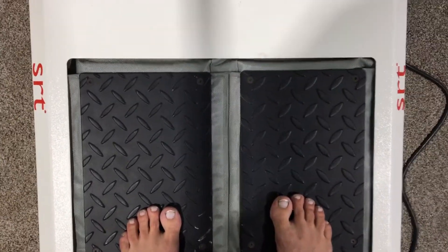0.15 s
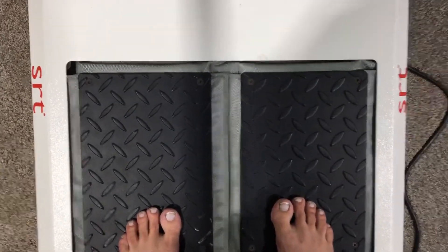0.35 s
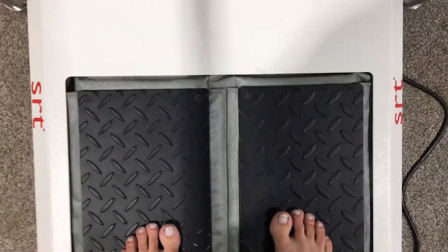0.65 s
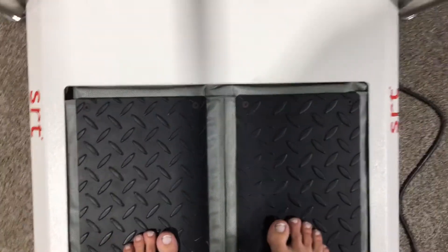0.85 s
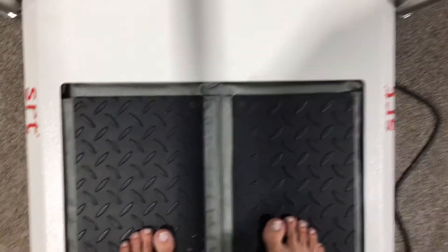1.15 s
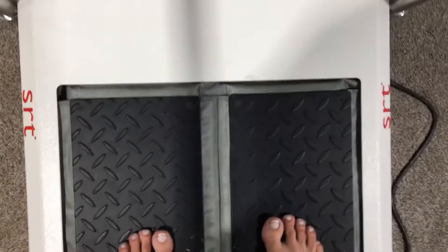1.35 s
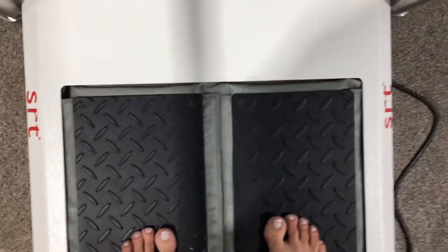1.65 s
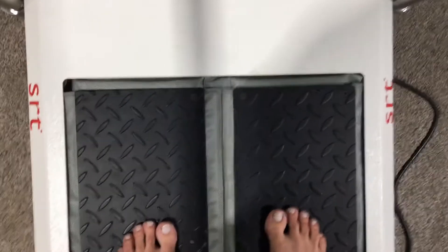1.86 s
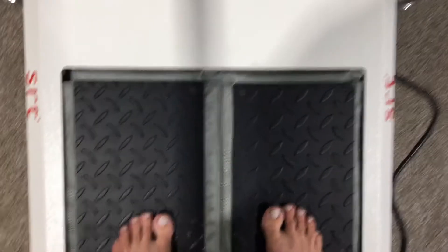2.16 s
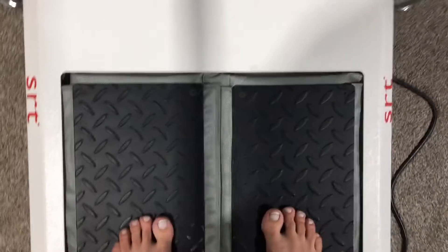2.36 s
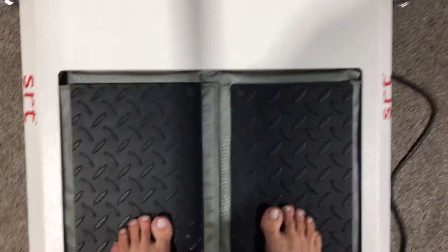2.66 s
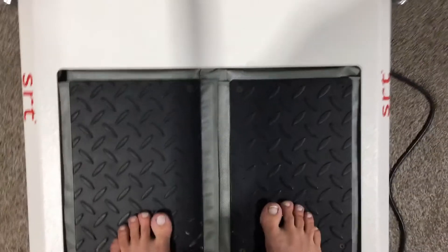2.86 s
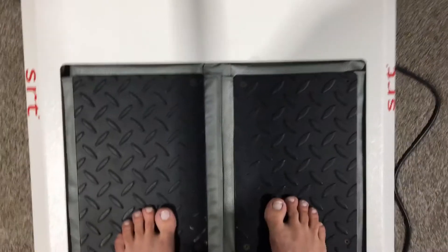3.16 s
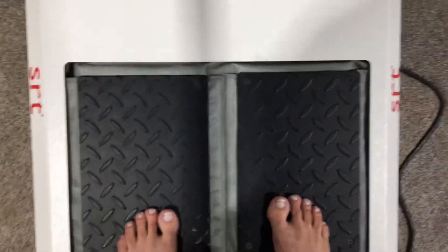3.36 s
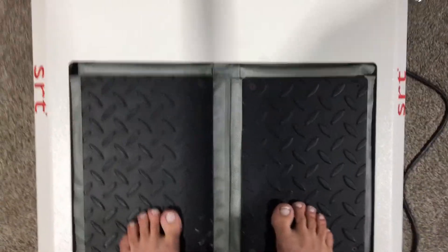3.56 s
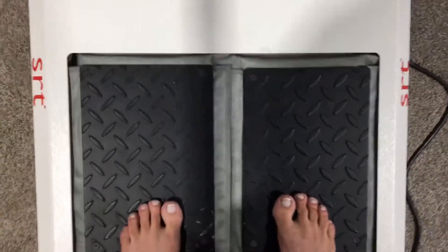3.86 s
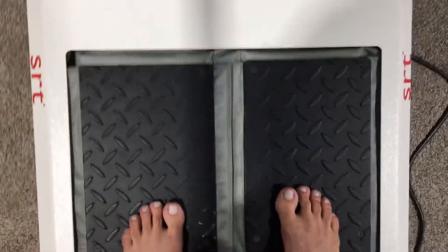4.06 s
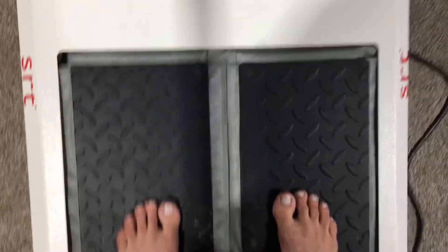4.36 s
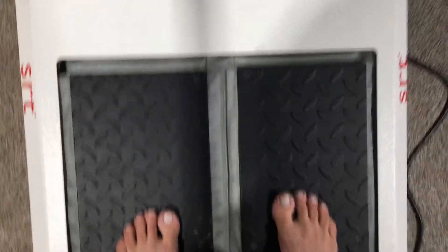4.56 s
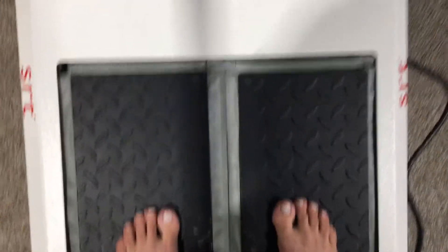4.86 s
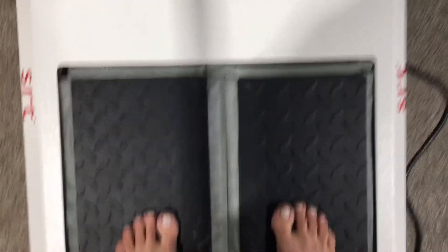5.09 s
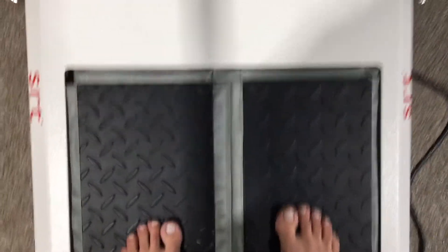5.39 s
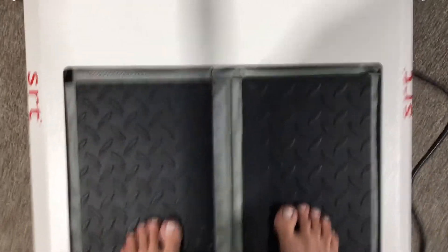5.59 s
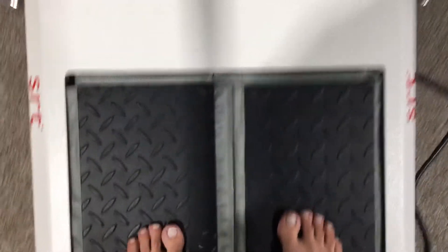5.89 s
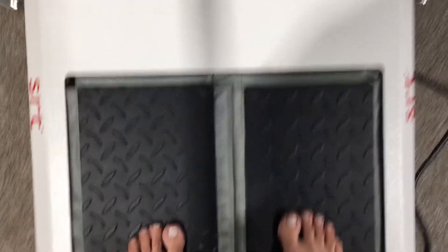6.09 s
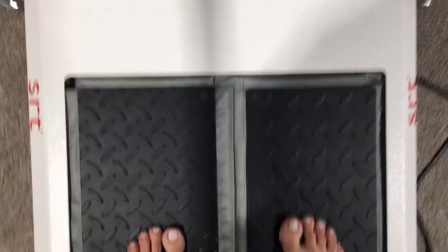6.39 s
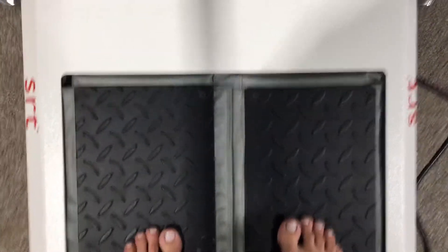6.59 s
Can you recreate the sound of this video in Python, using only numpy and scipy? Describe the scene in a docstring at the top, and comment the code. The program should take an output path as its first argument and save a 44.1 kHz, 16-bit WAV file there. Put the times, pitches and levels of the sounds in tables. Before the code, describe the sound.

A vibration therapy platform accelerates throughout, heard from above in a carpeted room with short, dull reverb. From the start its foot plates knock softly into a hollow housing, about ten low thuds a second, tripling in rate and growing much louder by the end. Dry ticks from the mounts dot the first 2 seconds, and crisp little fabric snaps continue until about 4 seconds. Humming overtones swell and fade as the speed climbs. From around 3 seconds loose parts buzz more strongly, and the plates' scratchy rubbing against their fabric edging grows, becoming a bright rhythmic hiss by 5 seconds. Between roughly 4.5 and 6 seconds the drive clacks, with several harder hits. Underneath are a very faint, thin motor whistle and a faint gear tone near 3 seconds. The machine is still running fast and loud at the end, near 6.7 seconds.

```python
"""In a carpeted room, a vibration therapy platform runs up to speed under bare feet, heard from above.
Its crank thuds the foot plates twice a turn into a hollow housing, and overtones swell as they climb
through its resonances. A slower stroke thumps, clacks and rubs the plates on their fabric edging
with a scratchy, rhythmic hiss, while loose parts buzz and the mounts tick.
Under it all are a faint gear tone and the thin whistle of the motor's switching supply."""
import sys
import numpy as np
from scipy import signal
from scipy.fft import rfft, irfft, next_fast_len
from scipy.io import wavfile
from scipy.ndimage import uniform_filter1d, map_coordinates

SR = 44100
rng = np.random.default_rng(int(sys.argv[2]) if len(sys.argv) > 2 else 0)


def generate_wav(signal):
    """Clip the signal to [-1, 1] and save it as 16-bit WAV at the path in sys.argv[1]."""
    frames = np.transpose(np.atleast_2d(signal))
    scaled = np.clip(frames, -1, 1) * 32767
    pcm = np.round(scaled).astype(np.int16)
    wavfile.write(sys.argv[1], SR, pcm)


N = 296966
TIME = np.arange(N) / SR
CRUISE_SPEED, TURNS_PER_STROKE = 12, 1.53  # speeds are in crank turns per second
DOWN_PLACE, RETURN_PLACE = .225, .725  # the ends of the plates' travel [turns]


def amp(db):
    """Decibels to gain."""
    return 10 ** (np.asarray(db) / 20)


def unit(x):
    """Scaled to rms 1."""
    return x / np.sqrt(np.mean(x ** 2) + 1e-20)


def curves(rows):
    """One value per sample for each column after the time."""
    s, *cols = np.transpose(rows)
    return [np.interp(TIME, s, c) for c in cols]


def wobble(rate):
    """A smooth random curve, rate knots a second."""
    return map_coordinates(rng.standard_normal(int(N * rate / SR) + 4), [TIME * rate])


def filtered(x, response):
    """x times a complex response of frequency."""
    m = 2 * next_fast_len(N // 2 + SR // 2)
    return irfft(rfft(x, m) * response(np.fft.rfftfreq(m, 1 / SR)), m)[:N]


def coloured(x, points):
    """x through a causal EQ drawn as (frequency [Hz], gain [dB]) points."""
    def response(hz):
        f, db = np.transpose(points)
        cepstrum = irfft(np.log(amp(np.interp(np.log(hz + 1), np.log(f), db))))
        cepstrum[1:len(hz) - 1] *= 2
        cepstrum[len(hz):] = 0
        return np.exp(rfft(cepstrum))
    return filtered(x, response)


def blows(cycles, place, scatter_db, jitter_s):
    """One blow per cycle at the given place, each a little different in size and time."""
    at = np.flatnonzero(np.diff(np.floor(cycles - place)) > 0)
    size, late = rng.standard_normal((len(at), 2)).T
    onsets = np.clip(at + late * jitter_s * SR, 0, N - 1).astype(int)
    return np.bincount(onsets, amp(scatter_db * size), N)


def contact(cycles, place, length):
    """A rounded gate that opens once per cycle."""
    off = (cycles - place + .5) % 1 - .5
    return np.exp(-.5 * np.abs(off / length) ** 3)


def grains(rate, spread_db):
    """Random tiny impacts of uneven size, rms 1."""
    impacts = (rng.random(N) < rate / SR) * rng.choice([-1, 1], N)
    return unit(impacts * amp(spread_db * rng.standard_normal(N)))


def bursts(rows, rise_s):
    """An envelope with one quick swell and decay for each (time [s], level [dB]) row."""
    out, u = np.zeros(N + SR), np.arange(SR // 10) / SR / rise_s
    for s, db in rows:
        out[round(s * SR):][:len(u)] += amp(db) * u * np.exp(1 - u)
    return out[:N]


def levelled(gate):
    """A gate scaled to a mean power of 1 over half a second."""
    return gate / np.sqrt(uniform_filter1d(uniform_filter1d(gate ** 2, SR // 2), SR // 4))


def step(x, middle, spread):
    """A soft step from 0 to 1 as x passes the middle."""
    return .5 + .5 * np.tanh((x - middle) / (2 * spread))


def growing(speed, cruise_db, doubling_db):
    """Gain of a part that is shaken harder with every doubling of speed."""
    return amp(cruise_db + doubling_db * np.log2(speed / CRUISE_SPEED))


def waking(speed, slow_db, rise_db, middle, spread):
    """Gain of a part that shakes loose around the middle speed."""
    return amp(slow_db + rise_db * step(speed, middle, spread))


def resonance(x, modes):
    """Gain as a frequency or speed x passes the (centre, half width, level [dB]) resonances."""
    return sum(amp(db) / (1 + ((x - centre) / width) ** 2) for centre, width, db in modes)


def thuds(turns, speed):
    """The plates land a firm, damped thud on every downstroke and a lighter one on the return."""
    # round, boxy thud: (frequency [Hz], gain [dB])
    thud_eq = [(70, -42.5), (140, -14.5), (185, -0.5), (215, 5.5), (255, -0.5), (290, -2), (320, -9),
               (400, -18.5), (480, -25.5), (900, -53.5), (3000, -120)]
    down = blows(turns, DOWN_PLACE, scatter_db=1.8, jitter_s=.00022)
    back = amp(-3) * blows(turns, RETURN_PLACE, scatter_db=2.5, jitter_s=.0003)
    thudding = unit(coloured((down + back) / np.sqrt(speed), thud_eq))
    return growing(speed, cruise_db=-32.5, doubling_db=8.5) * thudding


def crank(turns, speed):
    """The crank knocks the hollow body twice a turn: one steady blow, one more uneven."""
    down = blows(turns, .25, scatter_db=.67, jitter_s=.00024)
    up = blows(turns, .76, scatter_db=3.5, jitter_s=.00027)
    knocks = down + amp(-9) * coloured(up, [(50, -6), (100, 10.5), (200, 7.5), (400, -8)])
    return growing(speed, cruise_db=-34, doubling_db=8.9) * unit(body(knocks / np.sqrt(speed)))


def body(x, cut_hz=37):
    """Plates and housing boom at their low resonances; the deepest bass does not radiate."""
    # body modes: (frequency [Hz], width [Hz], level [dB])
    modes = [(51.4, 17.8, 1), (83, 16.2, 1), (102, 8.24, 3.5), (107.6, 11.84, 4), (139.6, 9.4, 2.5)]

    def response(f):
        boom = sum((-1) ** k * amp(db) * 1j * f * width / (hz * hz - f * f + 1j * f * width)
                   for k, (hz, width, db) in enumerate(modes))
        return boom * f ** 2 / (f ** 2 - cut_hz ** 2 - 1j * np.sqrt(2) * f * cut_hz)
    return filtered(x, response)


def hum(turns, speed, belt_order=24):
    """Overtones sing out in turn as they cross the resonances of plates, frame and belt."""
    # swells of the sprung plates: (crank order, frequency [Hz], half width [Hz], level [dB])
    plate_swells = [(6, 51.1, 6.5, -30), (9, 78.3, 9.5, -27.5), (10, 76, 4.4, -33.5), (9, 105.6, 6.4, -32),
                    (5, 52.7, 5, -32.5), (7, 80, 4.8, -42), (7, 88.8, 10, -28.5), (8, 95, 3.8, -30),
                    (6, 94.5, 7.9, -21.5), (4, 59, 5.6, -33.5)]
    # overtones that drive the frame: (crank order, level [dB])
    frame_drive = [(9, -21.5), (10, -35), (12, -29.5), (14, -35), (16, -36.5), (18, -36.5), (20, -33),
                   (22, -37)]
    # frame and belt resonances: (frequency [Hz], half width [Hz], level [dB])
    frame_modes = [(138.1, 5.8, -0.5), (209, 7.2, -6.5), (264, 5.6, -2)]
    belt_mode = [(137.2, 7.6, 0)]

    def overtone(order, modes):
        return np.cos(2 * np.pi * order * (turns - .27)) * resonance(order * speed, modes)
    plates = sum(overtone(order, [mode]) for order, *mode in plate_swells)
    frame = sum(amp(db) * overtone(order, frame_modes) for order, db in frame_drive)
    per_turn = belt_order / TURNS_PER_STROKE
    belt = amp(-27) * np.cos(2 * np.pi * per_turn * turns) * resonance(per_turn * speed, belt_mode)
    return plates + frame + belt


def housing(turns, strokes, speed):
    """The loaded plates jostle on their mounts and thump where the stroke reverses."""
    # deep rumble and hollow shell: (frequency [Hz], gain [dB])
    rumble_eq = [(15, -85.5), (30, -30.5), (50, -7.5), (85, 0.5), (113, 2), (127, 1), (138, 0), (149, -20),
                 (175, -16), (300, -89.5)]
    shell_eq = [(100, -43.5), (160, -21), (180, 2.5), (200, -1.5), (265, 1.5), (295, -3.5), (312, -7),
                (330, -11), (342, -18), (395, -15), (450, -26), (700, -76)]
    rumble = unit(coloured(grains(500, spread_db=1), rumble_eq))
    reversal = .41 + .04 * (speed - CRUISE_SPEED)  # later in the stroke as the speed grows
    by_crank = contact(turns, DOWN_PLACE, length=.072) + .5 * contact(turns, RETURN_PLACE, length=.071)
    jolts = .6 + by_crank + .45 * contact(strokes, reversal + .06, length=.12)
    chatter = unit(coloured(levelled(jolts) * grains(1200, spread_db=1), shell_eq))
    thumps = unit(coloured(blows(strokes, reversal, scatter_db=1.5, jitter_s=.002), shell_eq))
    return (growing(speed, cruise_db=-31, doubling_db=3.2) * rumble
            + growing(speed, cruise_db=-33, doubling_db=7.3) * chatter
            + growing(speed, cruise_db=-38.5, doubling_db=12.4) * thumps)


def slack_force(strokes, speed):
    """The drive's slack strikes and rebounds once a stroke, most near one speed, with a few hard hits."""
    # where the slack clacks most: (speed [turns/s], half width [turns/s], level [dB])
    clack_peak = [(13.68, 1.76, -40)]
    # hard accents: (time [s], relative level [dB])
    accents = [(4.574, -33), (4.817, -28.5), (4.999, -33), (5.053, -28), (5.399, -32), (5.511, -32),
               (5.621, -41), (5.94, -28), (6.049, -30), (6.716, -35)]
    strike = contact(strokes, .503, length=.055)
    rebound = amp(-7.5) * contact(strokes, .063, length=.053)
    regular = resonance(speed, clack_peak) * (strike + rebound)
    return np.maximum(regular, amp(-9) * bursts(accents, rise_s=.004))


def rattle(turns, strokes, speed):
    """The drive clacks, loose parts buzz, and the panel shakes after each thud and with each clack."""
    # hard clack, bright buzz and mid-range panel: (frequency [Hz], gain [dB])
    clack_eq = [(300, -15), (450, 5.5), (700, 9.5), (950, 2), (1300, 3.5), (1700, -7.5), (2300, -11),
                (3100, -14), (4500, -23), (12000, -55)]
    buzz_eq = [(400, -21.5), (750, 9.5), (1000, 6), (1300, 6.5), (1700, -2), (2150, -1), (2800, -7.5),
               (4500, -16), (8000, -25.5), (15000, -60)]
    panel_eq = [(280, -30.5), (375, 10), (440, 6), (500, 5), (560, 11), (620, 8.5), (710, 6), (800, -3.5),
                (1100, -39.5)]
    force = slack_force(strokes, speed)
    clack = force * unit(coloured(grains(6000, spread_db=1), clack_eq))
    buzz = unit(coloured(amp(2.56 * wobble(90)) * grains(2000, spread_db=-1.5), buzz_eq))
    after_thuds = 1 + .51 * (contact(turns, .36, length=.13) + contact(turns, .81, length=.073))
    shaking = after_thuds * np.sqrt(1 + .35 * unit(force))
    panel = unit(coloured(shaking * grains(1500, spread_db=2), panel_eq))
    return (clack + waking(speed, slow_db=-60.5, rise_db=9.5, middle=11.5, spread=1.14) * buzz
            + waking(speed, slow_db=-56, rise_db=10, middle=10.5, spread=1.05) * panel)


def rubbing(strokes, speed):
    """The plates brush their fabric edging once a stroke: dull and scratchy when slow, then hissy."""
    # where the first plate rubs: (time [s], place [strokes])
    rub_place = [(0, 0.895), (3, 0.86), (4.5, 1.04), (5.7, 1), (6.73, 0.95)]
    # how hard the plates press on the edging: (time [s], level [dB])
    pressure = [(0, -74.5), (1.1, -73.5), (2.2, -72), (2.9, -68), (4, -63), (4.8, -55.5), (5.7, -53.5),
                (6.73, -56.5)]
    # fibre hiss, dull scuff and squeaky crest: (frequency [Hz], gain [dB])
    hiss_eq = [(1500, -32), (3000, -10), (3600, 6), (4300, 5.5), (5000, -2), (6200, 2), (7600, -2),
               (9000, -1), (10300, -9.5), (11400, -4), (13500, -13), (15800, -8)]
    scuff_eq = [(2500, -6), (3500, -3.5), (4300, 1.5), (5000, -8), (7000, -19), (12000, -59)]
    squeak_eq = [(4000, -32), (7500, -12), (9000, 0), (10300, -2), (11400, -20), (13500, -13), (15800, -12)]
    first_place, = curves(rub_place)
    rub_db, = curves(pressure)
    slipping = step(speed, 9.73, spread=.35)  # the second plate slips out of step...
    fast = step(speed, 11.85, spread=.75)  # ...then stops rubbing
    slow = 1 - fast
    second_place = rub_place[0][1] - .53 * slipping
    second_rub = amp(1) * slow * contact(strokes, second_place, length=.087)
    length = .11 + .01 * fast
    gate = np.hypot(contact(strokes, first_place, length), second_rub)
    brush = np.hypot(gate, amp(-6.5 - 14 * fast))  # light brushing between the rubs
    sticking = slow * np.minimum(gate, 1)
    scratch = (1 - sticking) * amp(.8 * wobble(120)) + sticking * stick_slip()
    fibres = brush * unit(coloured(grains(14000, spread_db=3.5), hiss_eq))
    scuff = amp(2 + slipping) * slow * gate * unit(coloured(grains(5400, spread_db=5), scuff_eq))
    mid_rub = contact(strokes, first_place + .01, .56 * length)
    squeak = amp(-9) * mid_rub * unit(coloured(grains(7700, spread_db=1), squeak_eq))
    return amp(rub_db) * levelled(brush) / brush * (scratch * (fibres + squeak) + scuff)


def stick_slip(slips_per_s=81, decay_s=.012, slide=.31):
    """A train of tiny slips at an uneven rate over smooth sliding, rms 1."""
    cycles = np.cumsum(slips_per_s * amp(3 * wobble(50))) / SR
    slips = blows(cycles, 0, scatter_db=2, jitter_s=.001)
    return unit(slide + signal.lfilter([1], [1, -np.exp(-1 / (decay_s * SR))], slips))


def catches():
    """Crisp little snaps where the edging catches on a plate and lets go."""
    # fabric snaps: (time [s], relative level [dB])
    snaps = [(0.2218, -50), (0.3271, -53.5), (0.4922, -48), (0.7227, -58), (0.9537, -56), (1.1398, -53),
             (1.2072, -53), (1.3727, -53), (2.154, -52), (2.2257, -60), (2.4622, -47), (2.781, -47),
             (2.9147, -47), (3.052, -49), (3.215, -49), (3.496, -46), (3.5106, -46), (3.6385, -47),
             (3.6544, -44), (3.7707, -46), (3.7873, -43), (3.9229, -42), (4.0481, -47), (4.1808, -46)]
    # their crisp top: (frequency [Hz], gain [dB])
    snap_eq = [(2000, -25), (3800, 6), (7000, 2), (10000, -2), (12500, -7), (15800, -19)]
    return amp(-10.5) * bursts(snaps, rise_s=.0028) * unit(coloured(rng.standard_normal(N), snap_eq))


def ticks(t60_s=.03):
    """Dry ticks from the mounts while the plates still move slowly."""
    # single ticks: (time [s], relative level [dB])
    cues = [(0.058, -45), (0.098, -45.5), (0.123, -43.5), (0.2315, -42), (0.327, -59), (0.4625, -50),
            (0.4947, -49), (0.622, -44), (0.724, -44), (0.964, -47), (1.18, -47), (1.2705, -50),
            (1.399, -46), (1.468, -52), (1.5943, -57), (1.8565, -53), (2.1618, -47), (2.2107, -47),
            (2.2275, -44.5)]
    # their dry click: (frequency [Hz], gain [dB])
    tick_eq = [(400, -18), (900, 10.5), (1600, 8), (2400, -3), (4500, -16), (9000, -21), (15000, -41)]
    out, t = np.zeros(N + SR), np.arange(SR // 10) / SR
    for s, db in cues:
        snap = 9 * (t == 0) + .9 * amp(-60 * t / t60_s) * rng.standard_normal(len(t))
        out[round(s * SR):][:len(t)] += amp(db) * snap
    return coloured(out[:N], tick_eq)


def gear(turns, speed, order=60, panel_hz=570, half_width_hz=70):
    """The meshing teeth sing faintly as their pitch crosses a panel resonance."""
    near_panel = 1 / (1 + ((order * speed - panel_hz) / half_width_hz) ** 4)
    mesh = np.sin(2 * np.pi * order * turns + 1.1 * wobble(45))
    return amp(-53.5 + 2.7 * wobble(45)) * near_panel * mesh


def bearing():
    """A fine, steady crackle from the bearing."""
    # its narrow ring: (frequency [Hz], gain [dB])
    ring_eq = [(700, -22), (1200, -10), (1600, 14), (1900, 0), (2300, -14), (3200, -5), (8000, -21)]
    return amp(-68) * unit(coloured(grains(160, spread_db=4.5), ring_eq))


def whistle(turns, switch_hz=15000, supply_order=8):
    """The motor's switching supply whistles in two thin tones that spread apart with speed."""
    # whistle fader: (time [s], level [dB])
    fader = [(0, -73), (1.3, -72), (3.2, -67.5), (5, -75), (6.73, -79)]
    level_db, = curves(fader)
    carrier = np.sin(2 * np.pi * switch_hz * TIME + .7 * wobble(110))
    return amp(level_db + 1.7 * wobble(22)) * carrier * np.sin(2 * np.pi * supply_order * turns)


def room(x):
    """The short, dull reverb of a carpeted room; the lows ring longest, with the deep bass turned down."""
    # reverb decay: (frequency [Hz], time to fall 60 dB [s])
    decay = [(100, 0.71), (500, 0.13), (4000, 0.059), (15000, 0.11)]
    hz, t, noise = signal.stft(rng.standard_normal(SR // 3), SR, nperseg=256)
    t60 = np.interp(hz, *np.transpose(decay))
    tail = signal.istft(noise * amp(-60 * t / t60[:, None]), SR, nperseg=256)[1]
    bass_cut = signal.butter(2, 160, "high", fs=SR)
    return signal.lfilter(*bass_cut, signal.fftconvolve(x, tail / np.linalg.norm(tail))[:N])


def scene():
    """The crank takes up the load and speeds up; knocks and clatter feed the room."""
    # the crank's run-up: (time [s], speed [turns/s])
    run_up = [(0, 5.338), (7, 16.094)]
    speed, = curves(run_up)
    turns = np.cumsum(speed) / SR
    strokes = turns / TURNS_PER_STROKE
    unloaded = 1 - step(TIME, .27, spread=.0066)  # softer until the drive takes up the load
    knocking = crank(turns, speed) + thuds(turns, speed) + housing(turns, strokes, speed)
    knocking *= amp(-3.5 * unloaded)
    clatter = amp(-.5 * unloaded) * rattle(turns, strokes, speed) + ticks() + bearing()
    fabric = rubbing(strokes, speed) + catches()
    tones = hum(turns, speed) + gear(turns, speed) + whistle(turns)
    reverb = room(amp(-12) * (knocking + clatter))
    return (knocking + clatter + fabric + tones + reverb)[None]


def record(dry, top_hz=15830):
    """A brick-wall low-pass takes off the very top of the treble."""
    return np.array([filtered(x, lambda hz: hz < top_hz) for x in dry])


dry = scene()
out = record(dry)
generate_wav(out)
```